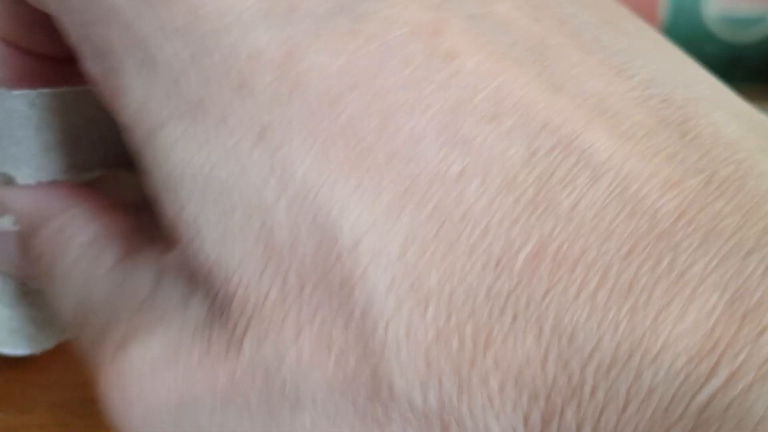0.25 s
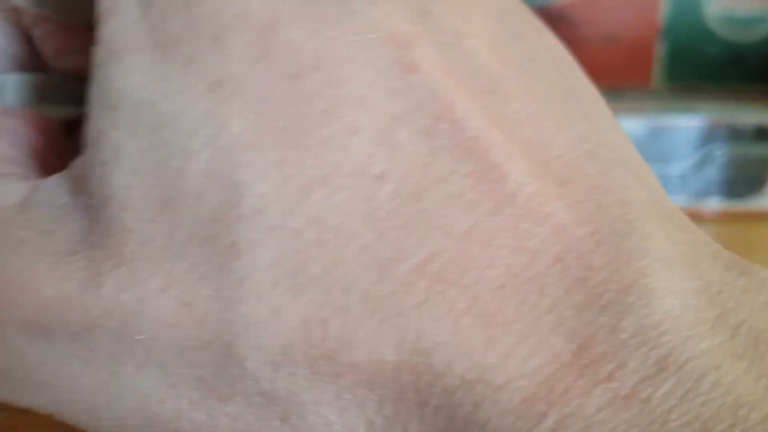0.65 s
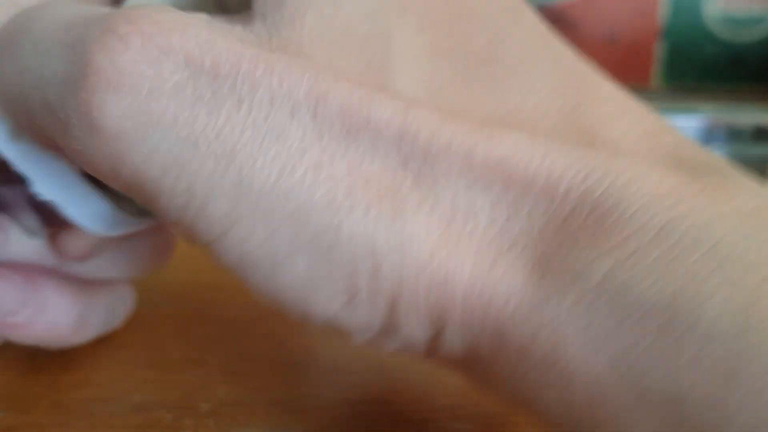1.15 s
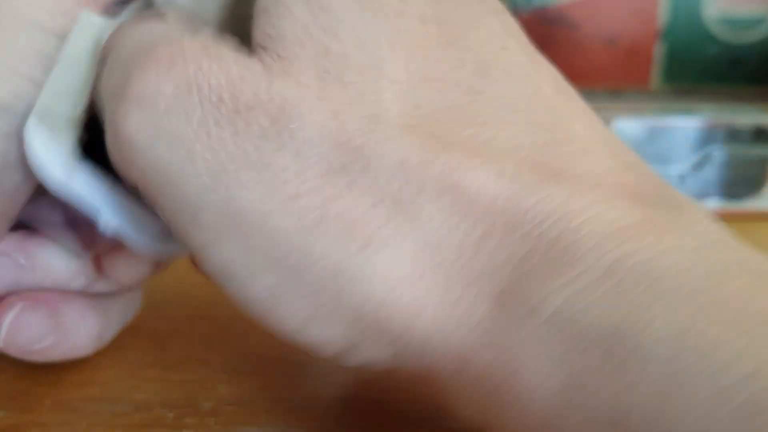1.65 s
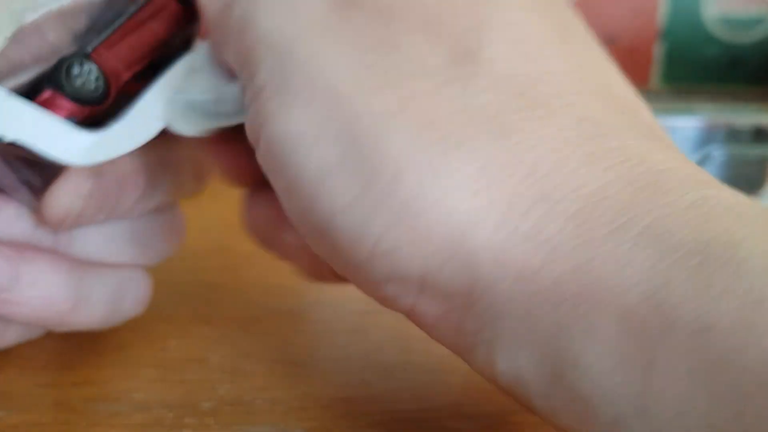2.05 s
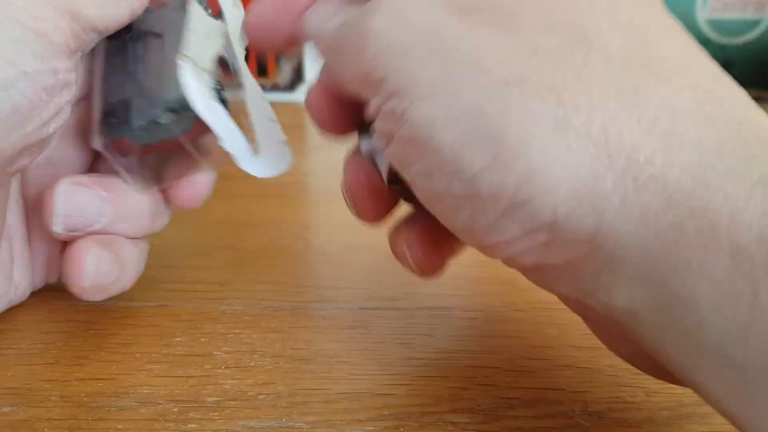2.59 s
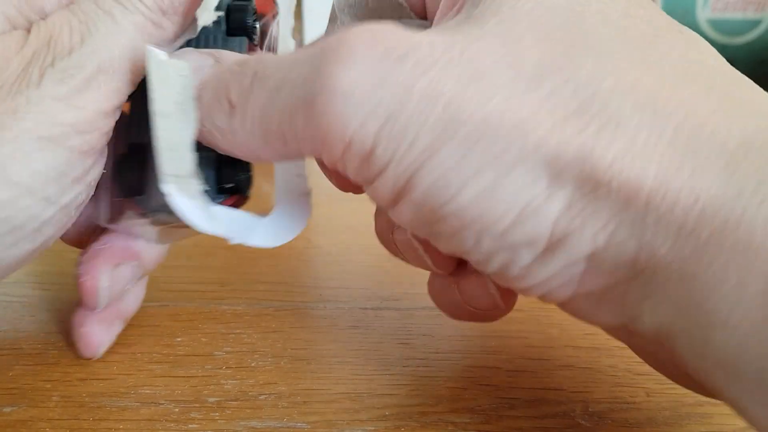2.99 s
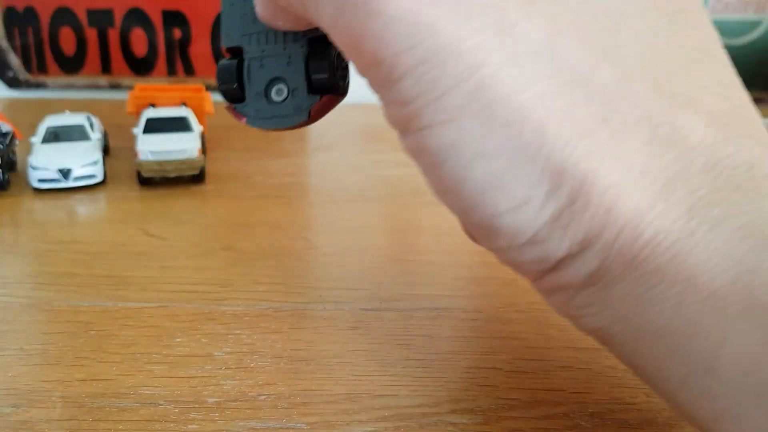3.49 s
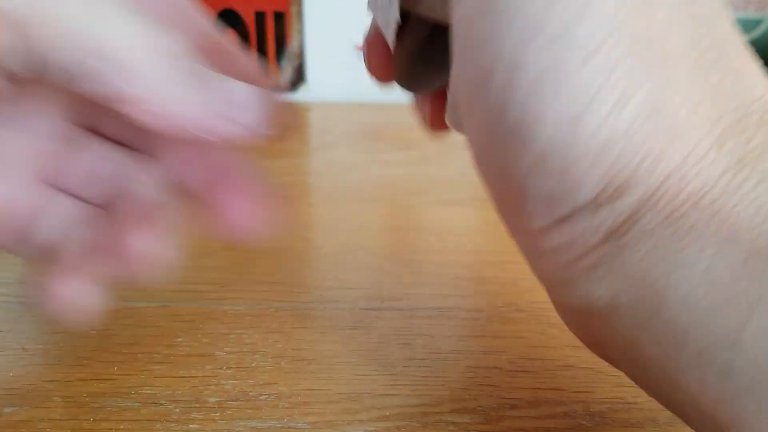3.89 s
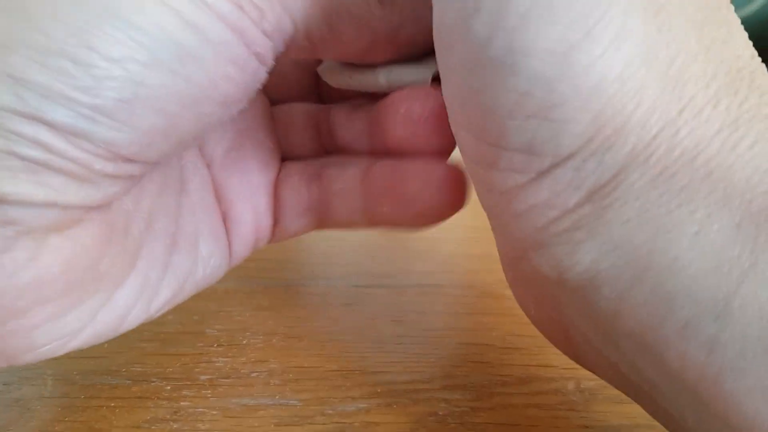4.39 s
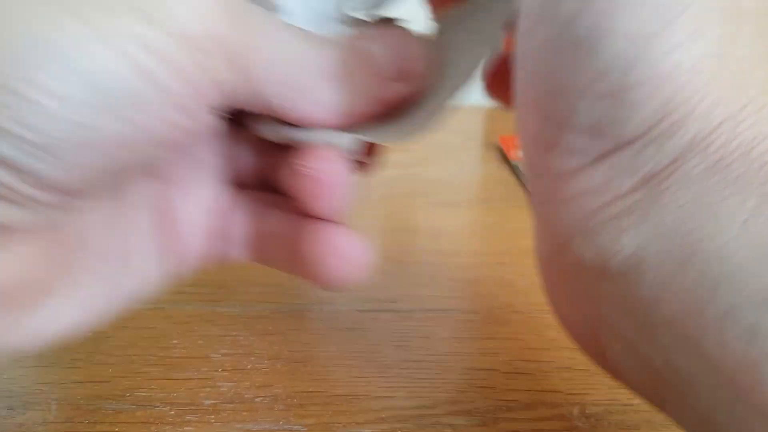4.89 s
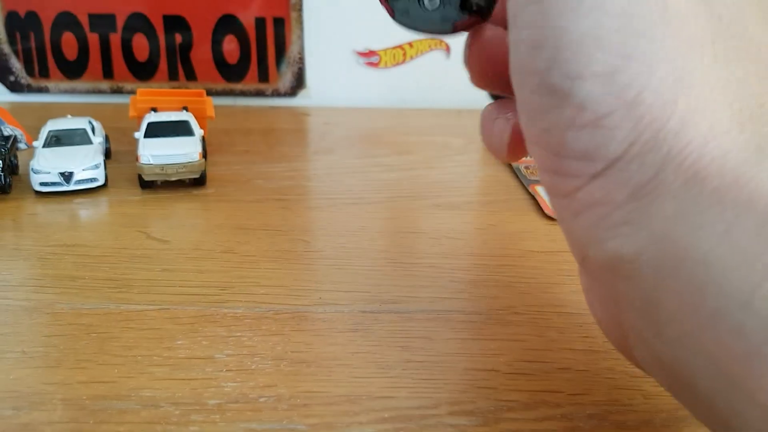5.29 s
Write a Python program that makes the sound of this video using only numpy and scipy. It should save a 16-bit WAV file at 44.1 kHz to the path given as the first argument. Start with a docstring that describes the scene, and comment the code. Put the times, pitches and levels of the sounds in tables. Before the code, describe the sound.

Close stereo sound of a thin plastic shell being pried from its card, slightly left of centre. Fingers rub and crinkle the pack, the shell buckles in hard dry snaps over short hollow thumps, and card rips in tiny rasps. The busy first two seconds thin to sparse pops, one final strong crack, then very quiet handling over low room noise with short reflections.

```python
"""Toy car pried out of its blister pack

Two hands work close by in a small room. The plastic shell buckles in sharp snaps over dull hollow knocks,
short rough bursts are tearing card or ragged tails just after snaps, and fingers rub, crinkle and bump the pack.
Snaps, bursts and rubbing share five parts: hollow thump, flat panel, stiff crease, cracking fold, surface fizz.
Noise and clicks ring damped modes or are filtered to each part's spectrum; knocks are decaying sines."""
import sys
import numpy as np
from scipy import signal
from scipy.fft import rfft, irfft, next_fast_len
from scipy.io import wavfile
from scipy.ndimage import map_coordinates

SR = 44100
rng = np.random.default_rng(int(sys.argv[2]) if len(sys.argv) > 2 else 0)


def file_out(sig):
    """Save sig as 16-bit WAV at sys.argv[1]."""
    # one column per channel
    cols = np.atleast_2d(sig).T
    # limit, then scale
    lim = np.clip(cols, -1, 1)
    pcm = np.round(lim * 32767).astype(np.int16)
    wavfile.write(sys.argv[1], SR, pcm)


N = 244446
TIME = np.arange(N) / SR
STEPS = TIME[::20]   # coarse clock for gains

# Spectrum of each part under friction. Each row: frequency in Hz, relative density in dB per Hz.
THUMP = [(60, -19), (110, -8), (220, -5.5), (330, -3), (480, 4.5), (600, -3), (800, -20.5)]
PANEL = [(450, -29.5), (650, -4), (920, 0.5), (1200, 5), (1550, -1.5), (2000, -24)]
CREASE = [(1300, -20), (1750, 0), (2100, 2), (2800, -4), (3400, -8.5), (4400, -29)]
CRACK = [(2800, -12), (3600, -2), (4700, -2.5), (5800, -0.5), (6800, -2.5), (8400, -16)]
FIZZ = [(5800, -23), (7200, -4), (8600, -2.5), (10500, 1), (13000, -0.5), (16000, -8.5)]
PARTS = (THUMP, PANEL, CREASE, CRACK, FIZZ)
# The pack is held left of centre. One value per part: left-over-right level in dB.
PART_LEFT_DB = (2.5, 3, 7.57, 8.4, 2.5)
# Knocks on the hollow of blister and cupped hands.
# Each row: start in seconds, pitch in Hz, level in dB before the layer gain, 60 dB decay in seconds.
KNOCKS = [(0.439, 338, -27, 0.019), (1.083, 595, -22, 0.046), (1.247, 455, -12, 0.026),
          (1.248, 230, -29.5, 0.052), (1.253, 116, -35.5, 0.039), (1.873, 110, -42, 0.026),
          (1.873, 550, -12.5, 0.017), (2.055, 282, -29, 0.061), (2.056, 653, -8.5, 0.021),
          (2.094, 175, -39.5, 0.049), (2.124, 88, -41, 0.083), (2.695, 295, -40.5, 0.043),
          (2.819, 212, -31.5, 0.038), (2.821, 497, -28.5, 0.033), (3.199, 615, -37.5, 0.2)]
# Soft bumps of palms and card, without a clear pitch.
# Each row: peak time in seconds, centre in Hz, level in dB, fall time constant in seconds.
BUMPS = [(0.01, 475, -54.5, 0.059), (1.372, 330.2, -51.5, 0.027), (1.682, 420, -50, .02),
         (2.24, 108, -61.5, 0.045), (2.527, 285, -54.5, 0.021), (3.215, 190, -54, 0.048),
         (3.365, 230, -56.5, 0.055), (3.62, 305, -53.5, 0.046), (3.68, 250, -56.5, 0.026),
         (4.42, 90, -68, 0.095), (4.51, 216, -70.5, 0.044), (4.65, 84, -71.5, 0.049)]


def from_db(db):
    """Decibels to gain."""
    return 10 ** (np.asarray(db) / 20)


def rms_one(x):
    """Scale to unit power."""
    return x / np.sqrt(np.mean(x ** 2) + 1e-20)


def at_hz(points, hz):
    """Read a table on a log-frequency axis."""
    f, value = np.transpose(points)
    return np.interp(np.log(np.maximum(hz, 1)), np.log(f), value)


def band(x, low_hz, high_hz, order=2):
    """Causal band-pass."""
    edges_hz = [low_hz, min(high_hz, SR / 2 - 1000)]
    return signal.sosfilt(signal.butter(order, edges_hz, "band", fs=SR, output="sos"), x)


def panned(left_db):
    """Left and right gains of constant power, for a fixed or a moving place."""
    gains = from_db(np.array([[1], [-1]]) * left_db / 2)
    return gains / np.sqrt(np.mean(gains ** 2, axis=0))


def drift(knots_per_s):
    """Random line through normal knots of spread 1."""
    knots = rng.standard_normal(4000)
    return np.interp(TIME * knots_per_s, np.arange(len(knots)), knots)


def swell(t, rise_s, fall_s):
    """Gain that rises exponentially to 1 at time zero and dies away."""
    return np.exp(np.maximum(np.minimum(t / rise_s, -t / fall_s), -20))


def coloured(pair, spectrum):
    """Mix two uncorrelated rows into a stereo pair with this spectrum, most alike in the bass; unit power."""
    # Each row: frequency in Hz, left-right correlation.
    likeness = [(60, .7), (300, 0.74), (700, 0.83), (1400, 0.1), (3100, 0.21), (7000, 0.065),
                (15000, 0.029)]
    size = next_fast_len(N)
    hz = np.fft.rfftfreq(size, 1 / SR)
    mid, side = rfft(pair, size)
    alike = np.clip(at_hz(likeness, hz), -1, 1)
    in_range = (hz > spectrum[0][0] / 2) * (hz < spectrum[-1][0] * 2)
    gain = from_db(at_hz(spectrum, hz)) * in_range
    stereo = np.sqrt(1 + alike) * mid + np.sqrt(1 - alike) * side * [[1], [-1]]
    return rms_one(irfft(gain * stereo, size)[:, :N])


def grains(per_s, size_db, smooth):
    """Tiny stick-slip clicks of uneven size over a smooth hiss; two rows share timing but not sign."""
    sizes = from_db(size_db * np.minimum(rng.exponential(1, N), 3))
    born = rng.random(N) < per_s / SR
    clicks = rms_one(born * sizes * rng.choice([-1, 1], (2, N)))
    return clicks + smooth * rng.standard_normal((2, N))


def uneven_colour(pair, spread_db, cells_per_s):
    """Uneven colour: narrow frequency ranges swell and fade at random."""
    hz, s, cells = signal.stft(pair, SR, nperseg=512)
    field = rng.standard_normal((64, 512))
    place = np.meshgrid(np.log2(1 + hz / 2000) * 7, s * cells_per_s, indexing="ij")
    gain = from_db(spread_db * map_coordinates(field, place, order=1, mode="mirror"))
    return signal.istft(cells * gain, SR)[1][:, :N]


def part_levels(db, fold_db, sharp_db, thump_db):
    """Levels of the five parts in dB: panel and crease share the ring, sharpness lifts crack and fizz."""
    crack_follows, fizz_follows = 0.84, 1.15   # dB per dB of sharpness: the finest splits gain most
    panel_db = db - 10 * np.log10(1 + from_db(fold_db) ** 2)
    return np.array([(db + panel_db) / 2 + thump_db, panel_db, panel_db + fold_db,
                     db + crack_follows * sharp_db, db + fizz_follows * sharp_db])


def held(rows, rise_s, fall_s, thump_db):
    """Gains of the five parts over time for contacts that rise, hold and release; powers add."""
    gates = []
    for start, end, *_ in rows:
        before = np.minimum(STEPS - start, 0) / rise_s
        after = np.maximum(STEPS - end, 0) / fall_s
        gates.append(np.exp(np.maximum(before - after, -20)))
    levels = from_db(part_levels(*np.transpose(rows)[2:], thump_db))
    gains = np.sqrt(levels ** 2 @ np.array(gates) ** 2)
    return np.array([np.interp(TIME, STEPS, gain) for gain in gains])


def background(tone_db, bump_over_knock_db):
    """Arms rumble on the table, jolted by each knock and bump, a deep one most; steady room noise below."""
    # Steady room noise. Each row: frequency in Hz, relative density in dB per Hz.
    room_tone = [(15, -58), (25, -22.5), (43, -1), (64, 2), (92, -15), (195, -9.5), (249, -29.5),
                 (405, -17), (451, -9.5), (607, -35), (5570, -35), (8360, -37.5), (16000, -27)]
    # Table rumble. Each row: frequency in Hz, relative density in dB per Hz.
    rumble_colour = [(22, -20), (42, -4), (75, 3), (105, -5.5), (170, -13.5)]
    jolt_db, jolt_db_per_octave, jolt_ref_hz = -13.5, -11, 100
    jolt_rise_s, jolt_fall_s = 0.0069, 0.05
    jolts = [row[:3] for row in KNOCKS]
    jolts += [(s, hz, db + bump_over_knock_db) for s, hz, db, _ in BUMPS]
    power = from_db(-78.5) ** 2   # resting arms
    for s, hz, db in jolts:
        gain = from_db(db + jolt_db + jolt_db_per_octave * np.log2(hz / jolt_ref_hz))
        power = power + (gain * swell(STEPS - s, jolt_rise_s, jolt_fall_s)) ** 2
    envelope = np.interp(TIME, STEPS, np.sqrt(power))
    rumble = envelope * coloured(rng.standard_normal((2, N)), rumble_colour)
    tone = from_db(-76.5 + tone_db) * coloured(rng.standard_normal((2, N)), room_tone)
    return (rumble + tone) * panned(2.2)


def room(x, near_share, near_s, first_s):
    """Dense early echoes from table and wall, then a short tail that dies band by band."""
    # Each row: frequency in Hz, 60 dB decay of the tail in seconds.
    tail_t60 = [(150, 0.12), (600, 0.24), (1500, 0.22), (5000, 0.21), (15000, 0.16)]
    # Colour of the room's answer. Each row: frequency in Hz, relative level in dB.
    answer_colour = [(150, -1), (600, -1.5), (1800, -4.5), (3400, 2.5), (6500, -0.5), (14000, 0.5)]
    t = np.arange(SR // 2) / SR
    edges_hz = np.geomspace(100, 17000, num=11)
    response = 0
    for low, high in zip(edges_hz, edges_hz[1:]):
        hz = np.sqrt(low * high)
        decay = from_db(-60 * t / at_hz(tail_t60, hz)) + near_share * np.exp(-t / near_s)
        alike = 1 / (1 + (hz / 900) ** 2)   # long waves are alike on both sides
        white = rng.standard_normal((3, len(t)))
        mixed = np.sqrt(alike) * white[2] + np.sqrt(1 - alike) * white[:2]
        echoes = mixed * decay * (t > first_s)
        response = response + band(echoes, low, high) * from_db(at_hz(answer_colour, hz))
    return signal.fftconvolve(x, rms_one(response) / np.sqrt(len(t)), axes=1)[:, :N]


def bumps(side_db):
    """Flesh damps these contacts to a short, dull puff of band-passed noise."""
    rise_s, width_octaves = 0.014, 1.6
    half = 2 ** (width_octaves / 2)
    mid, side = rng.standard_normal((2, N))
    pair = mid + from_db(side_db) * side * [[1], [-1]]
    out = np.zeros((2, N))
    for s, hz, db, fall_s in BUMPS:
        span = slice(max(round(s * SR) - SR // 10, 0), round(s * SR) + SR // 2)
        puff = rms_one(band(pair[:, span], hz / half, hz * half))
        out[:, span] += from_db(db) * swell(TIME[span] - s, rise_s, fall_s) * puff
    return out * panned(2.5)


def fingers():
    """Strokes on top of the shifting grip: gains of the five parts, and how far left the hands are in dB."""
    # A finger slides over the pack.
    # Each row: start in seconds, end in seconds, level in dB, fold in dB, sharpness in dB,
    # before the gains of rubbing; fold is crease over panel, sharpness lifts crack and fizz.
    strokes = [(0.073, 0.108, -42.5, -5, -4.5), (0.18, 0.21, -52, -20, -11.5),
               (0.295, 0.335, -49.5, -3, 2.5), (0.35, 0.42, -50, 3, -7.5), (0.76, 0.86, -54.5, -1, -5.5),
               (0.885, 0.925, -42.5, -8, -3.5), (1.01, 1.1, -45.5, -11, -8.5), (1.12, 1.21, -39.5, 2, -6),
               (1.26, 1.42, -47.5, -2, -9.5), (1.445, 1.465, -37.5, 4, -26), (1.62, 1.75, -47, -6, -7),
               (1.775, 1.81, -41.5, 3, -2), (2.03, 2.07, -41, -3, -7.5), (2.085, 2.14, -30.5, 6, -10.5),
               (2.31, 2.39, -52.5, 15, 0), (2.4, 2.51, -51, -0.5, -1), (2.6, 2.62, -62, 13, 4),
               (3.04, 3.13, -57.5, 4, -7), (3.17, 3.2, -41, 2.5, -6.5), (3.35, 3.39, -64, -14, -20),
               (3.562, 3.58, -51, 7, -3.5), (3.58, 3.665, -42.5, -1.5, -20.5),
               (3.69, 3.71, -54.5, -2.5, -12.5), (3.935, 4.02, -67.5, 15.5, 4),
               (4.035, 4.07, -59, 13.5, 3.5), (4.163, 4.285, -59.5, 6, 4), (4.35, 4.45, -67.5, 19.5, 6.5),
               (4.645, 4.685, -59, 11, 8), (4.77, 4.84, -68.5, 14, 1.5), (5.318, 5.37, -73, 9, 9),
               (5.4, 5.46, -75, 7.5, 7.5), (5.475, 5.54, -62.5, 7, -4.5)]
    # The hands keep shifting their grip.
    # Each row: time in seconds, level in dB and sharpness in dB as for strokes, left-over-right in dB.
    grip_points = [(0, -55, -10.5, 1.5), (0.55, -63.5, -3, 3), (1.1, -56, -6.5, -0.5),
                   (1.5, -51.5, -11.5, -2), (1.95, -51, -8.5, 1), (2.25, -64.5, -1.5, -2),
                   (2.75, -61.5, -5, -1), (3.28, -63, -4, 1.5), (3.47, -80.5, -1.5, 3),
                   (3.76, -64.5, -1.5, 2), (3.9, -72.5, 9, 2), (4.35, -64.5, 1, 0), (4.55, -73, 3.5, 0),
                   (4.8, -72, 5.5, -1), (5.0, -80.5, 6, 0.5), (5.22, -85, 3.5, -1), (5.54, -75, 4.5, 4.5)]
    fold_db, fold_follows = 3.5, 0.39   # a sharper touch stirs the crease more than the panel
    times = np.array(grip_points)[:, 0]
    columns = np.transpose(grip_points)[1:]
    db, sharp_db, left_db = [np.interp(TIME, times, column) for column in columns]
    grip = from_db(part_levels(db, fold_db + fold_follows * sharp_db, sharp_db, thump_db=-14.5))
    stroke = held(strokes, rise_s=0.009, fall_s=0.0086, thump_db=-16)
    return np.hypot(grip, stroke), left_db


def rubbing(friction, hands_left_db, part_db, catch_db, slide_db):
    """Skin catches on the pack and shakes its body, while the slide itself gives a finer, steadier hiss."""
    catching = uneven_colour(grains(per_s=1100, size_db=2.5, smooth=0.7), spread_db=6.0, cells_per_s=15)
    catching = catching * from_db(catch_db * drift(130))
    sliding = uneven_colour(grains(per_s=2400, size_db=2.0, smooth=0.68), spread_db=-0.5, cells_per_s=27)
    sliding = sliding * from_db(slide_db * drift(110))
    drives = (catching, catching, catching, sliding, sliding)
    out = 0
    for level, db, drive, colour, left_db in zip(friction, part_db, drives, PARTS, PART_LEFT_DB):
        out = out + level * from_db(db) * coloured(drive, colour) * panned(left_db + hands_left_db)
    return out


def rough_bursts(gain_db, rise_s, fall_s):
    """Short rough bursts of coarse clicks: tearing card, and ragged noisy tails just after some snaps."""
    # Tearing card and ragged tails of snaps. Each row: start in seconds, end in seconds,
    # level in dB before the layer gain, fold (crease over panel) in dB, sharpness in dB.
    burst_rows = [(0.371, 0.399, -51, -16, 6), (0.436, 0.467, -27.5, -18, -14), (1.21, 1.225, -29, -2, -10),
                  (1.242, 1.252, -17.5, -19, -10), (1.269, 1.275, -34, 12, -31),
                  (1.357, 1.38, -27, -7, -15.5), (1.582, 1.607, -37, 11.5, -9.5),
                  (1.676, 1.688, -33, -12, -22), (1.804, 1.826, -35.5, -23, -12),
                  (1.869, 1.903, -24.5, 5.5, -9.5), (2.052, 2.056, -21.5, -6, -4.5),
                  (2.089, 2.102, -33, -11, 0.5), (2.126, 2.147, -27.5, -5, -7.5),
                  (2.662, 2.676, -34, 25, -10), (2.68, 2.708, -41, 7.5, -17), (2.825, 2.844, -31, 1, -15.5),
                  (3.022, 3.053, -44.5, 17, -9.5), (3.194, 3.2, -19.5, 4.5, -8.5),
                  (3.201, 3.224, -27.5, 1, -9)]
    clicks = uneven_colour(grains(per_s=3200, size_db=5.0, smooth=0.16), spread_db=3.0, cells_per_s=40)
    levels = from_db(gain_db) * held(burst_rows, rise_s, fall_s, thump_db=-13)
    out = 0
    for level, colour, left_db in zip(levels, PARTS, PART_LEFT_DB):
        out = out + level * coloured(clicks, colour) * panned(left_db)
    return out


def knocks(gain_db, contact_s):
    """A soft contact sets the enclosed air ringing briefly: one decaying sine per knock."""
    out, t = np.zeros(N + SR), np.arange(SR // 3) / SR
    for s, hz, db, t60_s in KNOCKS:
        envelope = from_db(db + gain_db - 60 * t / t60_s) * (1 - np.exp(-t / contact_s))
        out[round(s * SR):round(s * SR) + len(t)] += np.sin(2 * np.pi * hz * t) * envelope
    return out[:N] * panned(2.3)


def crinkles(friction, left_db):
    """Tiny creases give way at random, level and sharpness following the rubbing; rows as for snaps."""
    per_s, slots_per_s = 9.2, 40
    over_rub_db, spread_db, sharp_offset_db = -0.5, 2.5, -2
    panel_mid_hz, crease_mid_hz, spread_octaves = 1361, 2200, 0.18
    rows = []
    for slot, (when, chance) in enumerate(rng.random((round(N / SR * slots_per_s), 2))):
        size, panel, crease, fold = rng.standard_normal(4)
        at = min(int((slot + when) * SR / slots_per_s), N - 1)
        if chance < per_s / slots_per_s:
            ring_db, fizz_db = 20 * np.log10([np.hypot(*friction[1:3, at]), friction[-1, at]])
            rows.append((at / SR, ring_db + over_rub_db + spread_db * size,
                         panel_mid_hz * 2 ** (spread_octaves * panel),
                         crease_mid_hz * 2 ** (spread_octaves * crease),
                         3 + 6 * fold, fizz_db - ring_db + sharp_offset_db, 6.5 + left_db[at]))
    return rows


def resonance(x, hz, q, skirt):
    """A damped mode of the shell; it radiates little far from its pitch."""
    r = np.exp(-np.pi * hz / q / SR)
    rung = signal.lfilter([1, 0, -1], [1, -2 * r * np.cos(2 * np.pi * hz / SR), r * r], x)
    return band(rung, hz / (1 + abs(skirt)), hz * (1 + abs(skirt)))


def snap(row, panel_q, crease_q, thump_hz, slip_s, after_slips, crack_s, rise_s, fizz_s, lag_s):
    """One buckle: a jump and a brief run of smaller slips ring the shell while the fold cracks."""
    thump_db, panel_hz, panel_db, crease_hz, crease_db, crack_db, fizz_db, left_db = row
    nominal_s = 0.005   # a part's level is its energy over this length
    t = np.arange(SR // 20) / SR
    white = rng.standard_normal((4, 2, len(t)))
    push = (t == 0) + after_slips * (white[0, 0] + white[1]) * np.exp(-t / slip_s)
    splitting = white[2] + white[3, 0]
    crack = splitting * np.exp(-t / crack_s) * (1 - np.exp(-t / rise_s))
    # the fizz swells softly and peaks slightly after the jump
    fizz = splitting * (t / fizz_s) ** 2 * np.exp(-t / fizz_s)
    parts = [(thump_db, band(resonance(push, thump_hz, 0.8, 1.0), 260, 810)),
             (panel_db, resonance(push, panel_hz, panel_q, 0.36)),
             (crease_db, resonance(push, crease_hz, crease_q, 0.28)),
             (crack_db, band(crack, 3200, 7500)),
             (fizz_db, band(fizz, 7000, 14000))]
    # each part takes its own share of the sideways lean
    sides = [panned(np.clip(left_db, -3, 12) * share) for share in (0.49, 0.85, 1, 1, 0.38)]
    sound = sum(from_db(db) * rms_one(x) * side for (db, x), side in zip(parts, sides))
    sound = sound * np.sqrt(nominal_s * SR / len(t))
    sound[1] = np.roll(sound[1], round(lag_s * SR))
    return sound


def snaps(rows, gain_db, bounce_db, bounce_s, room_db):
    """All buckles with their bounce off the table, and the share that the hands let out into the room."""
    direct = np.zeros((2, N + SR))
    for s, db, panel_hz, crease_hz, fold_db, sharp_db, left_db in rows:
        thump, panel, crease, crack, fizz = part_levels(db + gain_db, fold_db, sharp_db, thump_db=-20.5)
        parts = (thump, panel_hz, panel, crease_hz, crease, crack, fizz, left_db)
        sound = snap(parts, panel_q=3.4, crease_q=5.7, thump_hz=420, slip_s=0.0018, after_slips=0.16,
                     crack_s=0.0012, rise_s=0.0004, fizz_s=0.00053, lag_s=1 / SR)
        direct[:, round(s * SR):round(s * SR) + sound.shape[1]] += sound
    bounce = from_db(bounce_db) * np.roll(direct, round(bounce_s * SR), axis=1)
    return (direct + bounce)[:, :N], from_db(room_db) * direct[:, :N]


def scene():
    """Snaps, crinkles, knocks, bumps, rough bursts and rubbing in the room, over its background."""
    # The shell buckles. Each row: start in seconds, level in dB before the layer gain, panel mode in Hz,
    # crease mode in Hz, fold (crease over panel) in dB, sharpness (lift of crack and fizz) in dB,
    # left-over-right in dB before limiting and each part's share.
    snap_rows = [(0.2961, -35.5, 1340, 2140, -5, -29, 12), (0.3314, -35.5, 1310, 1950, -5, -21, 12),
                 (0.3437, -39, 1470, 1830, -7, -16, 12), (0.3796, -36.5, 1180, 2070, -7, -3, 12),
                 (0.4368, -11, 1355, 1960, 1, -13.5, 12), (0.4614, -17, 1150, 2090, 3, -6.5, 6.5),
                 (0.6303, -30.5, 1200, 2200, 7, -9.5, 14), (1.0797, -18.5, 1190, 2190, -9.5, -3, 2),
                 (1.0821, -17.5, 1170, 1700, -0.5, -14, 14.5), (1.139, -30.5, 1080, 2050, -12, -4.5, 9),
                 (1.1507, -34, 1290, 2100, 2.5, -8.5, -5), (1.1766, -31, 1350, 2130, -3, -13, -2),
                 (1.202, -13.5, 930, 2660, -12.5, -17, 5), (1.2447, -13, 1180, 1860, -12, -25, 3),
                 (1.2473, -16, 980, 2100, -2.5, -22, 6), (1.2684, -24, 1100, 1800, -3.5, -26, 4.5),
                 (1.2989, -35.5, 1390, 2340, 16, -31, 2), (1.3312, -21, 1370, 2060, 9, -27, 10),
                 (1.3411, -27.5, 1390, 2080, 2, -13, 12), (1.3672, -20.5, 960, 1920, -15, -24, 6),
                 (1.3969, -28.5, 850, 1870, -4, -24, 4), (1.4333, -11, 1080, 1850, -9, -13.5, 5),
                 (1.467, -32.5, 1180, 1840, -21, -16, -1), (1.551, -31.5, 1180, 2330, -4, -15, 5),
                 (1.573, -11.5, 1180, 2390, 4.5, -21.5, 2), (1.6642, -20, 1150, 1740, -8.5, -33, 7),
                 (1.7608, -21, 894, 1780, -29, -35, 7), (1.776, -30.5, 1140, 2070, -0.5, -14, 10),
                 (1.7826, -26, 990, 2150, -16, -11.5, 5), (1.807, -31.5, 920, 2200, -11, -1.5, 7),
                 (1.8695, -17.5, 1260, 2340, -3.5, -14, 7), (1.8754, -10.5, 1330, 2220, 0.5, -8.5, 6),
                 (2.0551, -12, 1394, 1800, -9, -28, 12), (2.0567, -15, 1040, 1880, -12, -18, 1),
                 (2.0936, -27.5, 1220, 2480, 16, 0, 1), (2.1077, -21.5, 1170, 1920, -4, -21, 11),
                 (2.126, -18, 1560, 1690, 15, -28, 12), (2.144, -20.5, 1270, 1920, -0.5, -32, 8),
                 (2.2158, -33.5, 1450, 1870, -6, -12.5, 6), (2.234, -41.5, 1580, 1930, -10, -25, 12),
                 (2.279, -40.5, 1490, 1770, 1, -6.5, 15), (2.3332, -38.5, 1300, 2360, -8, -21, 10),
                 (2.3908, -36.5, 1590, 1880, 15, -16, 7), (2.669, -28.5, 1380, 2900, 10, -18, 10),
                 (2.7019, -35.5, 1410, 2200, -6, -13, 11), (2.774, -46, 1200, 2340, 1.5, -16, 10),
                 (2.8195, -21.5, 1170, 1840, -7, -17, 2.5), (2.823, -23, 1190, 1850, -5, -30.5, 9),
                 (2.8325, -29.5, 1440, 2280, -2, -19, 9), (2.8393, -33.5, 1400, 2020, -5, -8, 12),
                 (2.97, -37.5, 1300, 1800, -2, -15.5, 16.5), (3.0559, -31.5, 1150, 1706, -4.5, -17, 14),
                 (3.1957, -8, 1420, 2736, -12, -16.5, 7.5), (3.56, -52.5, 1510, 2070, 6.5, -3.5, 12),
                 (3.6133, -35.5, 1222, 2020, 8, -20.5, 16), (3.6505, -39, 1130, 2190, 1.5, -19, 8),
                 (4.1843, -53, 1510, 2270, 13.5, 1.5, 1.5), (4.2318, -53.5, 1488, 2456, 7.5, 6.5, -5.5),
                 (4.3027, -38, 1425, 2610, 8.5, -13, 5.5), (4.353, -68, 1360, 2680, 3, 7, 8),
                 (5.477, -59, 1390, 3120, 11.5, 0, 9)]
    friction, hands_left_db = fingers()
    buckles, escaping = snaps(snap_rows, gain_db=-3.0, bounce_db=-14.0, bounce_s=0.0027, room_db=-12.5)
    hollow = knocks(gain_db=-1.0, contact_s=0.001)
    bursts = rough_bursts(gain_db=-4.5, rise_s=0.0008, fall_s=0.0019)
    handling = rubbing(friction, hands_left_db, part_db=(-0.8, -2.0, -2.1, -1.7, -1.4),
                       catch_db=1.5, slide_db=3.0)
    sent = escaping + from_db(-9) * bursts + from_db(-13) * (handling + hollow)
    echo = room(sent, near_share=0.46, near_s=0.014, first_s=0.0055)
    floor = background(tone_db=-1.0, bump_over_knock_db=14)
    crinkle_rows = crinkles(friction, hands_left_db)
    ticks, _ = snaps(crinkle_rows, gain_db=-1.5, bounce_db=-16.0, bounce_s=0.0034, room_db=-11.5)
    return buckles + ticks + bumps(side_db=-12) + hollow + bursts + handling + echo + floor


def record(dry):
    """Clip at full scale, then cut steeply above 16 kHz."""
    low_pass = signal.ellip(10, 0.1, 80, 16000, fs=SR, output="sos")
    return signal.sosfilt(low_pass, np.clip(dry, -1, 1))


dry = scene()
out = record(dry)
file_out(out)
```